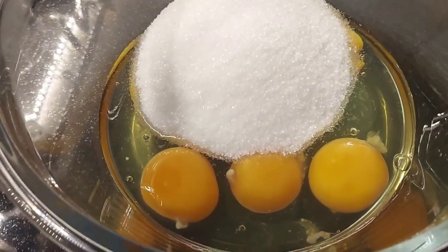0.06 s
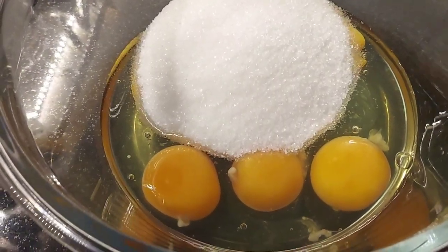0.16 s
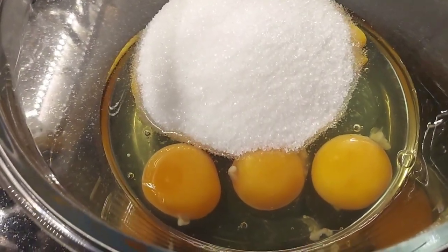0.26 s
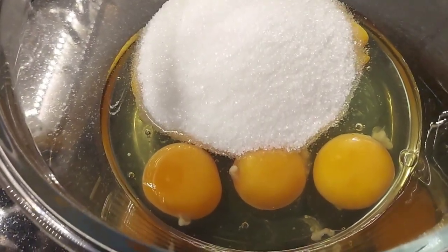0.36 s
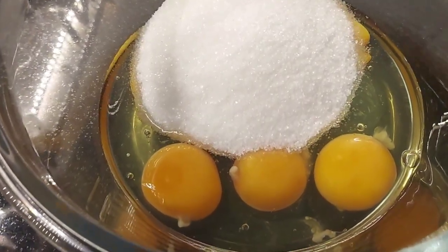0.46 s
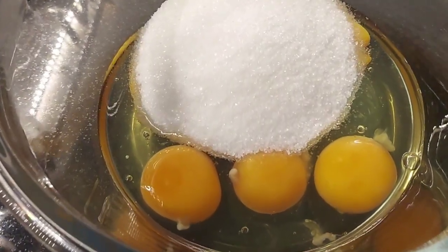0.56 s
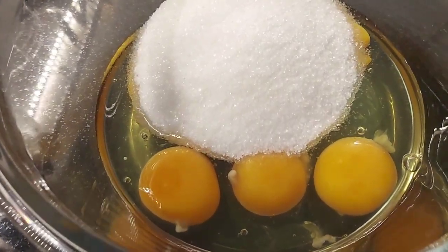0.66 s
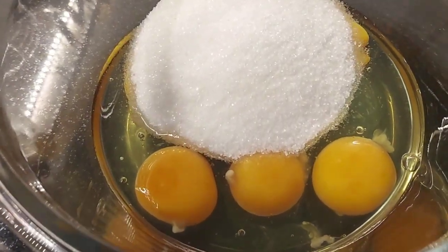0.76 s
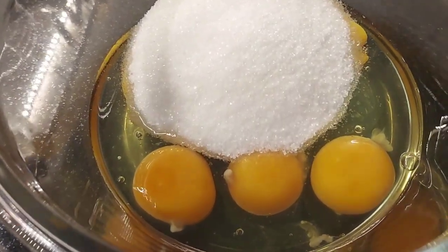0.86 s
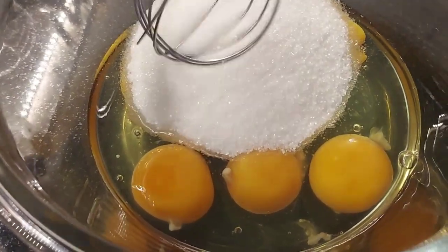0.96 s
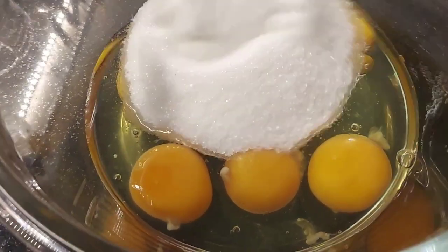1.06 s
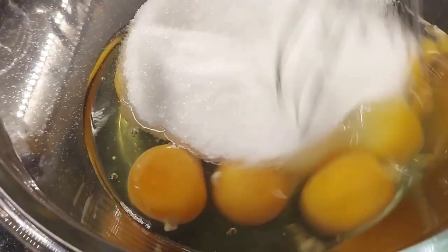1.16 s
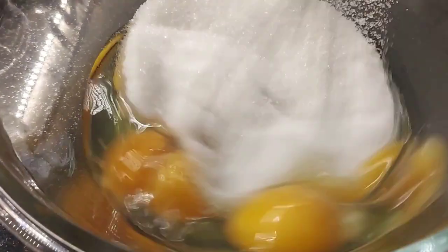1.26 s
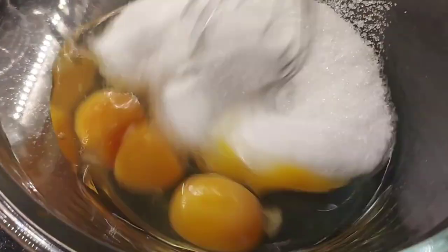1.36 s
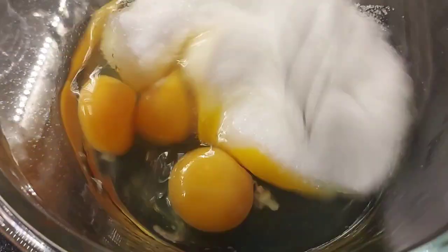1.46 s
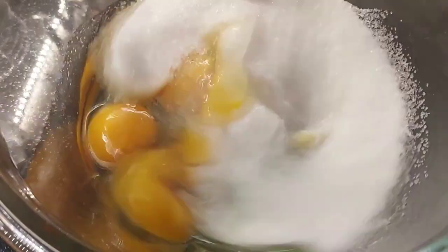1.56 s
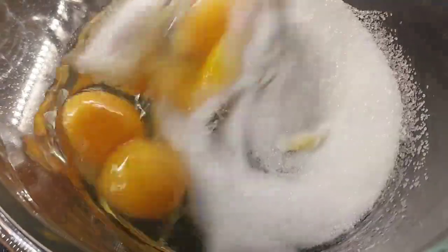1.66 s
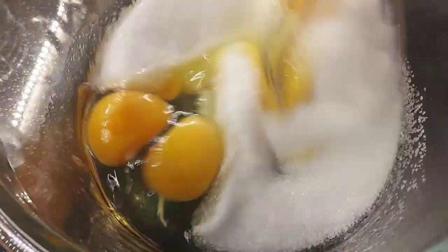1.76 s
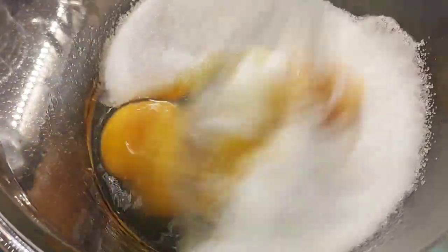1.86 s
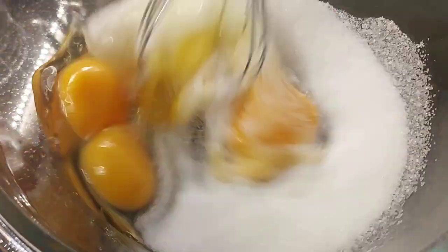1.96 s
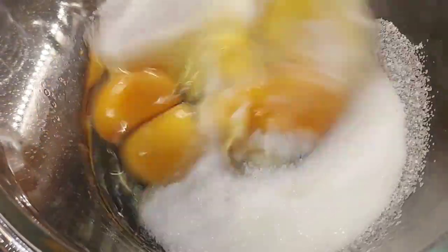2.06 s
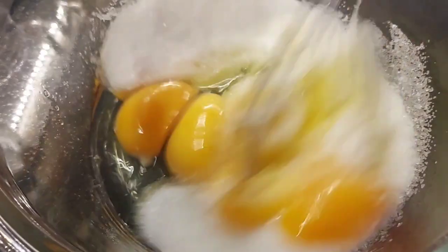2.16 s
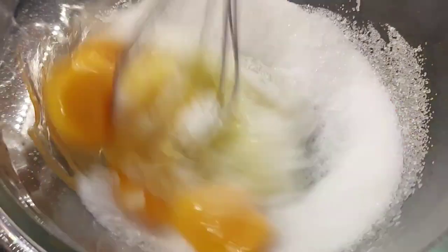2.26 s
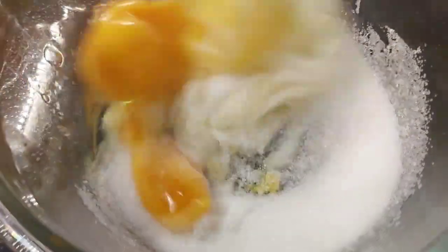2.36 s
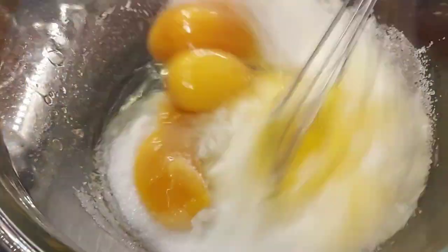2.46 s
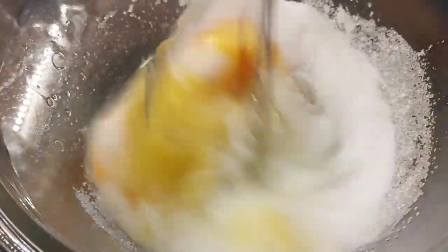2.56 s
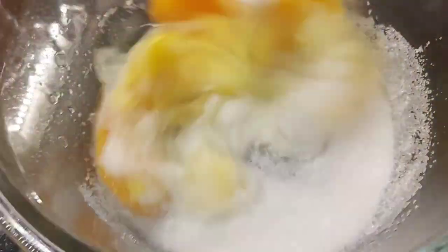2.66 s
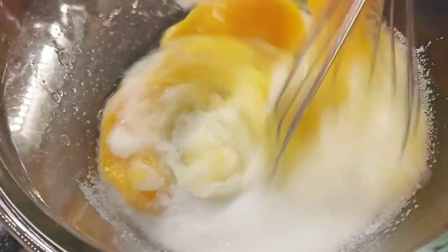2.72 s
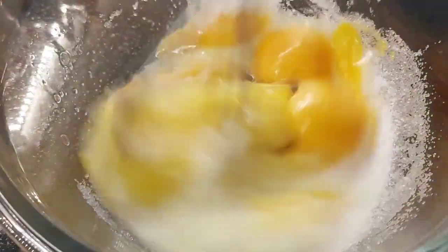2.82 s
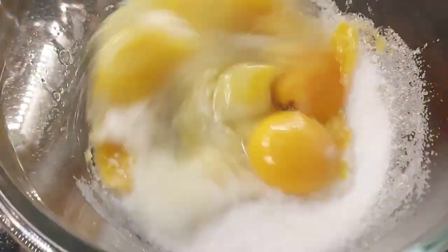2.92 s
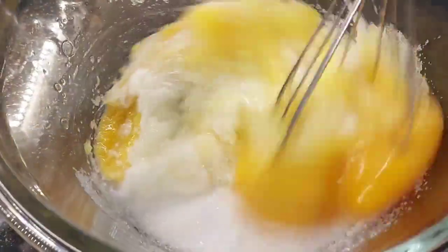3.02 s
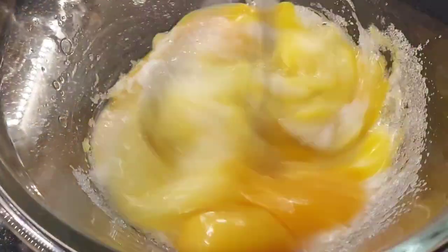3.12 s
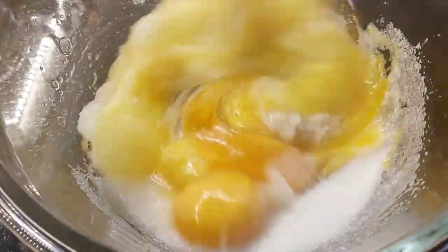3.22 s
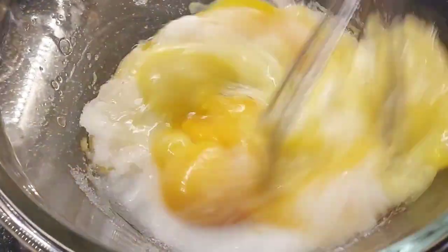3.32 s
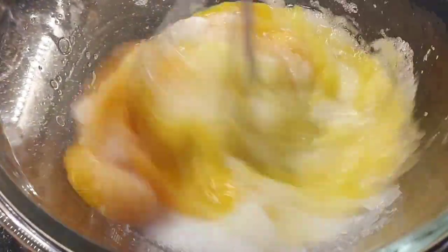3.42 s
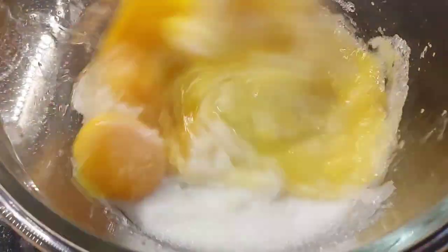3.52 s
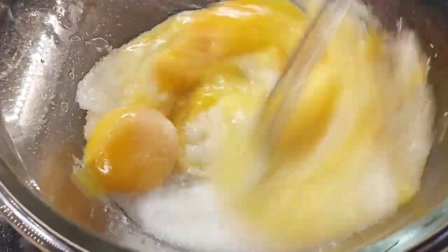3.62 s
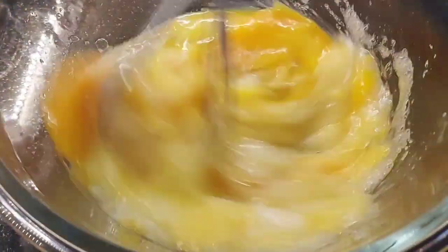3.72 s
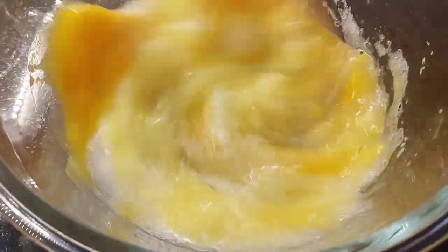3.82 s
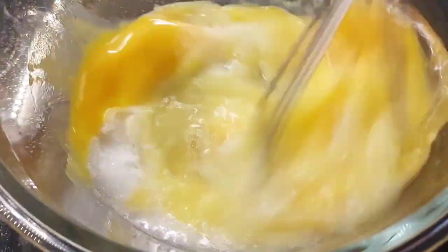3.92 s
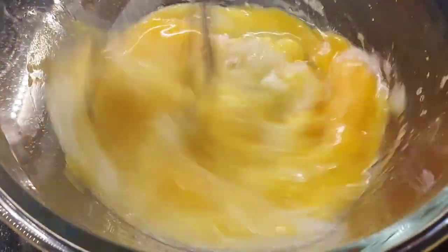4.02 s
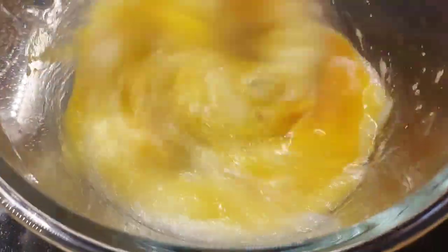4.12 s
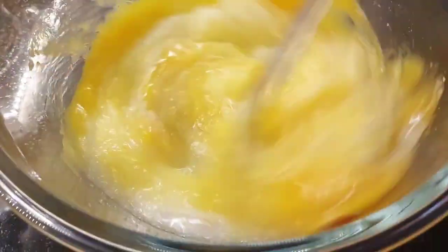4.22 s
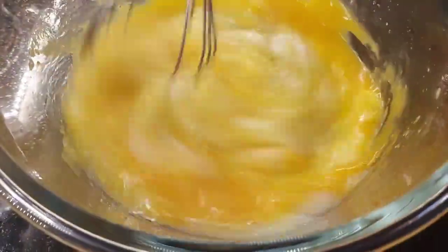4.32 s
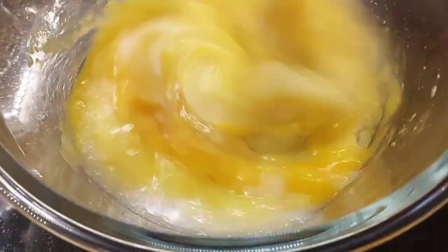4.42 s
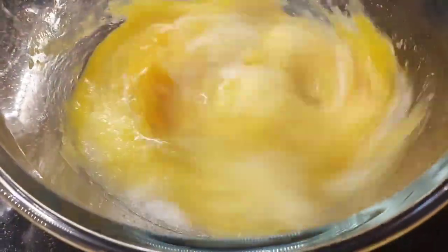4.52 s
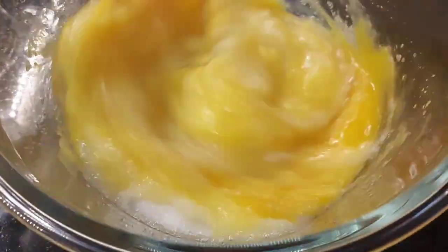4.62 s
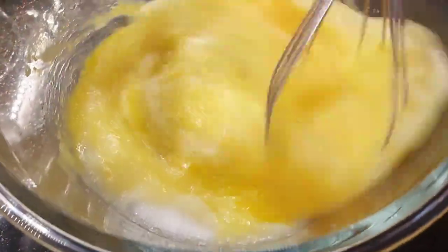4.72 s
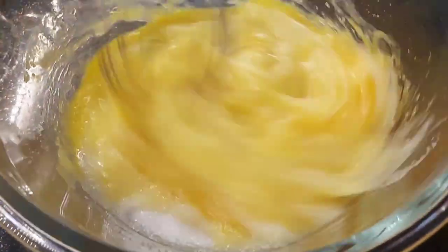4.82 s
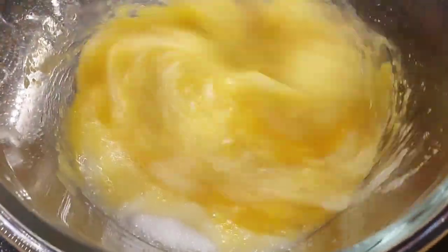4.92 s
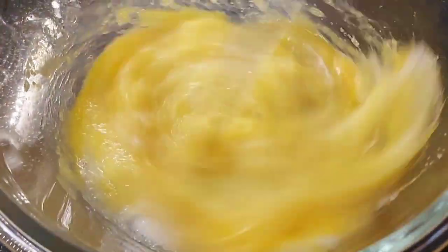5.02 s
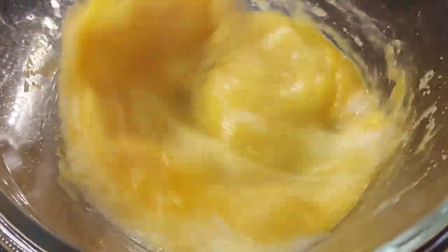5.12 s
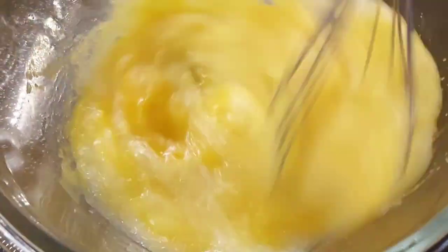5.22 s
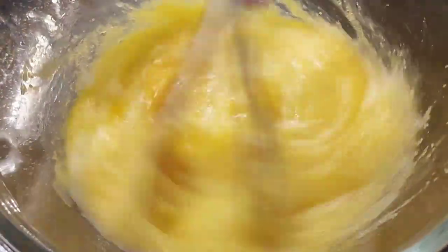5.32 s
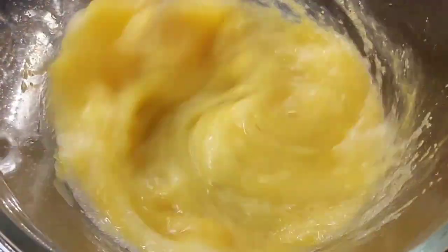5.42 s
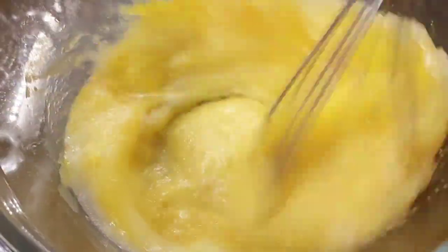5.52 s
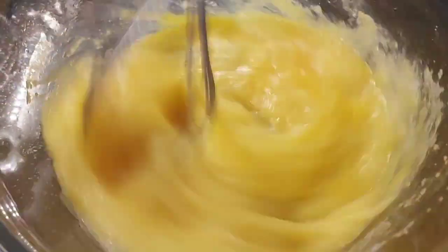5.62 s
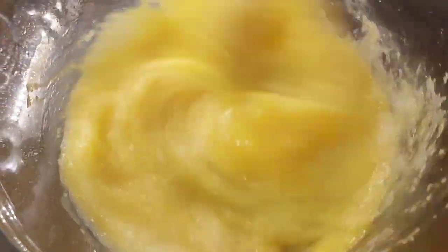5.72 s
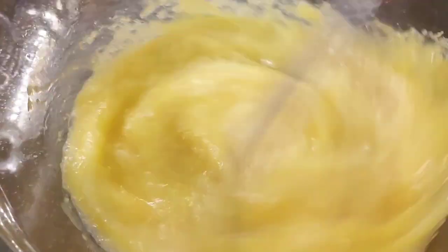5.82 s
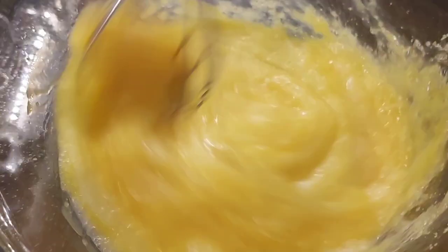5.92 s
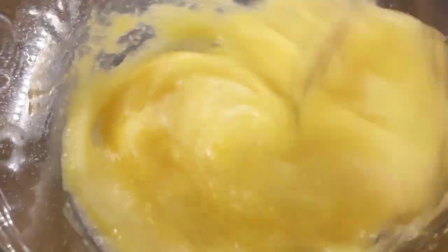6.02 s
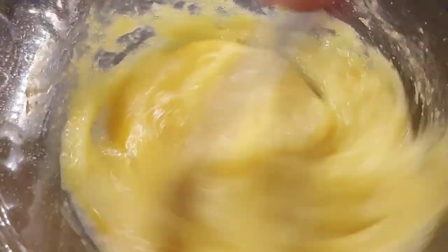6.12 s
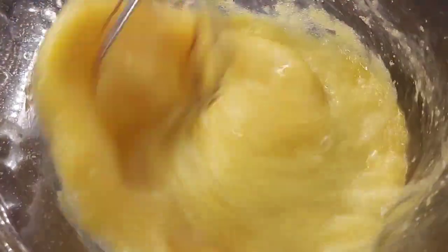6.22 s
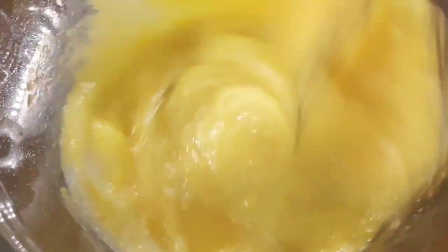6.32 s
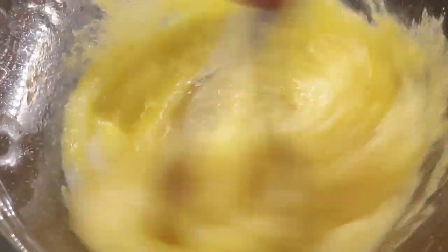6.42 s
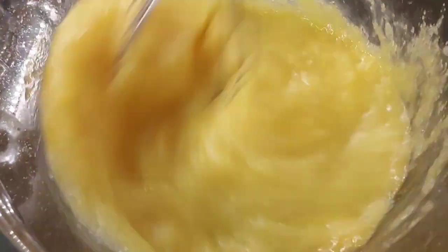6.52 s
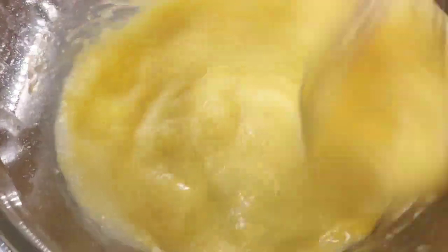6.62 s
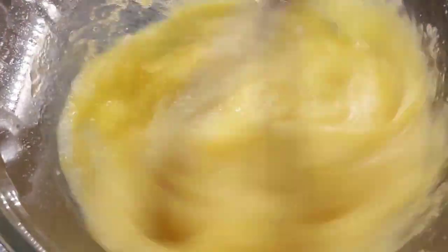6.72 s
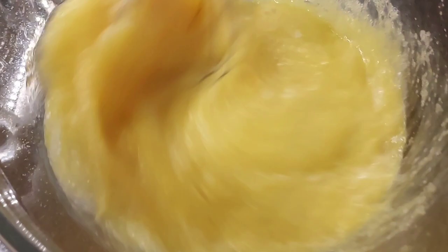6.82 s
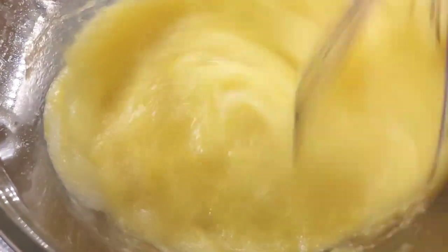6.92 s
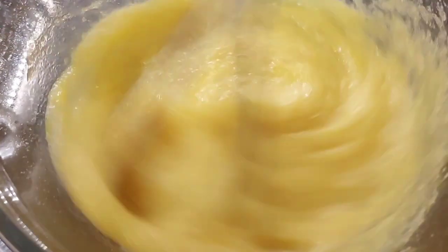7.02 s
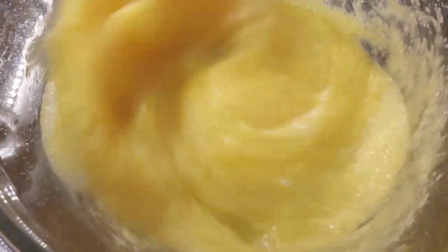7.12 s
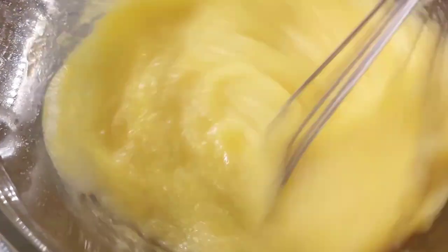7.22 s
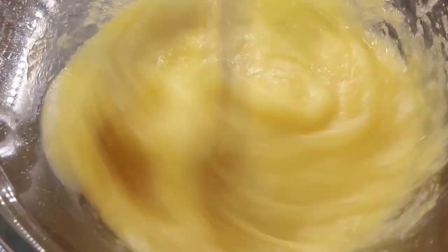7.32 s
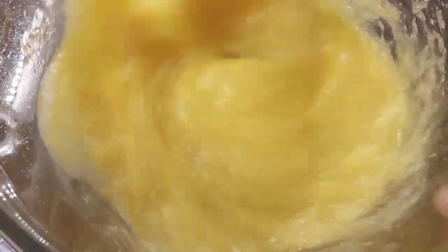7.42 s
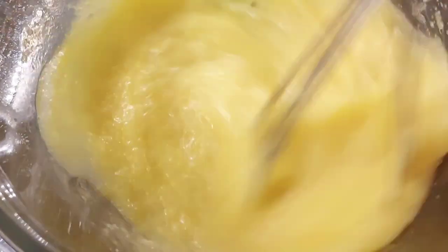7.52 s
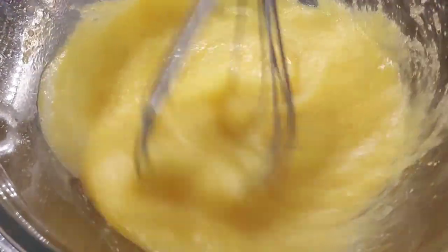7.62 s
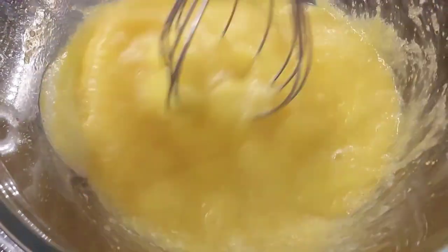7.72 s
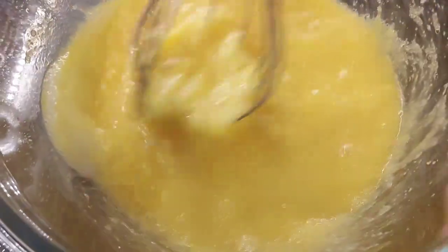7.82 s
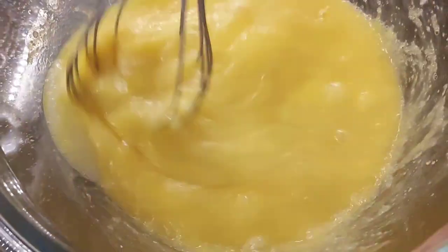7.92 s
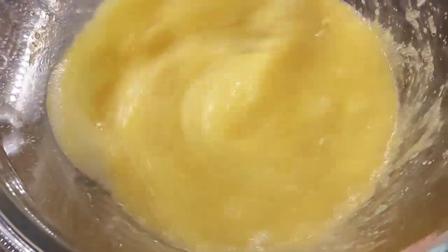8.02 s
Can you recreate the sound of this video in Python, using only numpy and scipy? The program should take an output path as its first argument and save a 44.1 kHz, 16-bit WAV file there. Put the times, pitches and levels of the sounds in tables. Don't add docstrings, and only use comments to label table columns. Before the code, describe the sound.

Close up in a small quiet kitchen, a faint utensil ring dies away and about a second of near silence follows. A wire whisk then grinds sugar and egg in a glass bowl in gritty, uneven strokes. As the mix gets wet, the wires clack, flick and scrape sharply on the glass with short rings, loudest in the later strokes, then stop.

```python
import sys
import numpy as np
from scipy import signal
from scipy.fft import rfft, irfft
from scipy.io import wavfile

SR = 44100
rng = np.random.default_rng(int(sys.argv[2]) if len(sys.argv) > 2 else 0)


def wav_out(sig):
    wavfile.write(sys.argv[1], SR, np.round(np.clip(np.atleast_2d(sig).T, -1, 1) * 32767).astype(np.int16))


def convert_level_to_amplitude(level_db):
    exponent = np.asarray(level_db, float) / 20
    return 10 ** exponent


N = 355887

# press_s, grit_db, slosh_db, ease_off_20db_s
TURNS = [(1.211, -37, -49, 0.0729), (1.58, -42, -56, 0.3436), (1.69, -52, -69.5, 0.02),
         (1.9, -45, -61, 0.43), (2.259, -43.5, -52, 0.5), (2.523, -36.5, -45.5, 0.1958),
         (2.81, -41, -49, .4), (3.121, -42, -49.5, .5), (3.375, -42, -54, .5), (3.693, -36.5, -46.5, 0.15),
         (4.022, -38, -44.5, 0.136), (4.146, -44, -52, 0.22), (4.289, -36, -44.5, 0.0859),
         (4.577, -32.5, -41, 0), (4.829, -32.5, -38.5, 0.07), (4.98, -39.5, -44, 0.29),
         (5.069, -35.5, -44, 0.04), (5.21, -38, -56, 0.46), (5.338, -37, -46.5, 0.2176),
         (5.61, -34.5, -38, 0.1319), (5.885, -33.5, -49, 0.0619), (6.04, -43.5, -50, 0.6),
         (6.153, -33.5, -56.5, 0.1738), (6.438, -32, -40, 0.1849), (6.741, -35.5, -43.5, 0.3281),
         (7.037, -30.5, -39, 0.0639), (7.168, -38.5, -44, 0.0944), (7.317, -37, -41, 0.1294),
         (7.5, -40, -44.5, 0.16), (7.621, -31.5, -50, 0.0281)]
# time_s, grit_db, slosh_db
IDLE = [(0, -66, -53), (.08, -63.5, -67), (.3, -64, -91), (.46, -72.5, -79), (.7, -90.5, -77),
        (.8, -62, -75), (.88, -63, -72), (.96, -79, -73.5), (1.052, -78.5, -71.5), (1.07, -56, -79.5),
        (2.2, -50, -58.5), (3.6, -53.5, -54.5), (4.3, -58.5, -60), (6.3, -56, -53.5), (7.6, -53.5, -52.5),
        (7.68, -61, -61), (7.742, -75, -76.5), (8.07, -70, -70.5)]
# time_s, share_0_to_1
WETNESS = [
    (0, 0),
    (2.0, .1),
    (3.2, .5),
    (4.3, 1),
    (8.07, 1),
]
# start_s, level_db, fall_t60_s, dull_re_bright_db
TOUCHES = [(.4002, -58, .012, 8), (.4285, -65, .089, -5.5), (1.1454, -35.5, 0.032, -24),
           (1.186, -33, 0.039, -17), (1.212, -31, 0.0506, -6), (1.593, -29, 0.047, -26.5),
           (1.677, -39.5, 0.036, -15.5), (1.9065, -34, 0.0605, -8), (2.2745, -31.5, 0.0296, -19),
           (2.358, -35, 0.0106, -25), (2.482, -31.5, 0.041, -28), (2.521, -31, 0.045, -21.5),
           (2.608, -35.5, 0.04, -13.5), (2.794, -37, 0.142, -7.5), (2.8956, -25, 0.0337, -8.5),
           (3.0033, -34, 0.0162, -25), (3.041, -35, 0.0415, -21.5), (3.0622, -35, 0.0326, -29.5),
           (3.3314, -34.5, .01, -9.5), (3.3691, -24.5, 0.0167, -19.5), (3.3837, -24.5, 0.0163, -21),
           (3.5747, -31, 0.0325, -14.5), (3.693, -27.5, 0.04, -17), (3.949, -35.5, 0.058, -4),
           (4.0104, -30, 0.0565, -24.5), (4.137, -34.5, 0.0243, 1), (4.2104, -31.5, 0.0224, -20),
           (4.2605, -33.5, 0.035, -6), (4.287, -25, 0.0505, -9.5), (7.8337, -72.5, .12, -2)]
# start_s, level_db, fall_t60_s, dull_re_bright_db
BUNDLE_SLAPS = [(4.5466, -30.5, 0.046, -13), (4.5659, -23.5, 0.057, -16), (4.7725, -31.5, 0.0355, -7),
                (4.828, -24.5, 0.044, -6.5), (4.975, -27, 0.031, -11.5), (4.9862, -22, 0.0248, -14.5),
                (5.057, -21, 0.027, -9.5), (5.075, -22, 0.041, -32), (5.2142, -20, 0.0237, -10.5),
                (5.231, -23, 0.0386, -22.5), (5.298, -26.5, 0.027, -17), (5.3298, -28, 0.122, -19.5),
                (5.6017, -17, 0.0222, -8), (5.6121, -15.5, 0.034, -20.5), (5.878, -20.5, 0.0286, -26),
                (5.8868, -19.5, 0.026, -21.5), (6.133, -24, 0.011, -5), (6.1416, -16, 0.046, -25.5),
                (6.366, -27.5, 0.0216, -1.5), (6.427, -20, 0.0473, -5.5), (6.4929, -25.5, 0.032, -19),
                (6.7256, -21.5, 0.0237, -16), (6.7522, -19.5, 0.0267, -26), (7.034, -28, 0.047, -22.5),
                (7.242, -29, 0.053, -6.5), (7.277, -27, 0.013, -9), (7.304, -29, 0.037, -16.5),
                (7.3172, -19, 0.0674, -5.5), (7.5448, -38.5, 0.0332, -2), (7.6093, -20.5, 0.0315, -18.5)]
# start_s, level_db
FLICKS = [(2.184, -42), (2.861, -39), (2.971, -41), (3.12, -37), (3.419, -36), (3.601, -33), (3.989, -36),
          (4.157, -32), (4.246, -32), (4.324, -35), (4.435, -41), (4.5899, -28), (4.68, -44), (4.751, -36),
          (4.857, -33), (4.919, -38), (5.0148, -31.5), (5.28, -28.5), (5.3653, -27.5), (5.512, -37),
          (5.562, -33), (5.575, -30), (5.5877, -33), (5.658, -33.5), (5.757, -35), (5.7765, -32),
          (5.7984, -28.5), (5.8232, -27.5), (5.933, -34), (6.051, -38), (6.068, -36), (6.084, -31),
          (6.109, -33), (6.1242, -29.5), (6.314, -32), (6.395, -33), (6.506, -33), (6.5436, -33.5),
          (6.596, -38), (6.67, -33), (6.694, -31), (6.815, -33), (6.957, -37), (7.097, -40), (7.187, -35),
          (7.2216, -35), (7.265, -29.5), (7.411, -41), (7.441, -36), (7.483, -28.5), (7.517, -37),
          (7.579, -33)]
# start_s, peak_db, pitch_hz
CRACKS = [(4.0097, -23.5, 3980), (4.2095, -25.5, 7910), (4.2591, -22.5, 4630), (4.2844, -20.5, 4000),
          (4.4937, -28.5, 2780), (4.5135, -24.5, 4800), (4.5276, -23.5, 1400), (4.5461, -21, 1340),
          (4.565, -17, 6540), (4.5774, -22, 4020), (4.5873, -21, 5700), (4.704, -26, 2710),
          (4.7356, -30.5, 6140), (4.7721, -21.5, 1350), (4.811, -22, 8740), (4.8314, -16.5, 7620),
          (4.9585, -23.5, 1930), (4.9736, -23.5, 6190), (4.9853, -20.5, 6470), (5.0559, -15, 1410),
          (5.0675, -13.5, 1220), (5.0736, -21, 3980), (5.1484, -36.5, 1470), (5.1656, -31, 5560),
          (5.2047, -21, 4170), (5.2112, -18.5, 3460), (5.23, -17, 6590), (5.2603, -21.5, 4070),
          (5.2774, -25.5, 4000), (5.2972, -19, 1310), (5.3301, -15, 8800), (5.5534, -24, 6520),
          (5.6005, -11.5, 1340), (5.6094, -14.5, 3980), (5.7184, -22, 12000), (5.7979, -27, 7590),
          (5.8218, -22.5, 8690), (5.8765, -14, 6680), (5.883, -13, 7440), (6.0089, -33, 9530),
          (6.1324, -17.5, 9320), (6.1404, -14, 6450), (6.215, -27.5, 1410), (6.361, -23.5, 11200),
          (6.3685, -21.5, 6470), (6.4261, -17.5, 1430), (6.432, -15, 2880), (6.4911, -19, 4020),
          (6.6677, -28, 2850), (6.6926, -25.5, 1400), (6.7241, -14, 6620), (6.7504, -17, 6400),
          (6.8044, -27, 7350), (6.8753, -28, 10400), (6.9557, -30.5, 6500), (6.99, -31, 8150),
          (7.007, -21, 1740), (7.1439, -29, 2740), (7.2401, -21.5, 1280), (7.3132, -13.5, 1430)]
# start_s, peak_db, pitch_hz
EARLY_CRACKS = [(1.1268, -37, 6480), (1.1418, -35, 2580), (1.1841, -34, 2570), (1.263, -35.5, 3650),
                (1.3204, -42, 3610), (1.503, -35.5, 2180), (1.5909, -27, 6600), (1.9001, -25.5, 3750),
                (1.9044, -27, 3540), (2.2728, -28.5, 5900), (2.356, -26.5, 11800), (2.4234, -35.5, 3710),
                (2.4808, -27.5, 6250), (2.5192, -26, 7240), (2.6045, -30, 4460), (2.794, -28, 4220),
                (2.8936, -20, 5400), (3.039, -33, 4000), (3.1842, -36, 2060), (3.3318, -29.5, 2010),
                (3.3552, -26.5, 1450), (3.3691, -20, 9250), (3.5718, -25, 2720), (3.6401, -33, 4010),
                (3.6639, -26.5, 4400), (3.6766, -23, 4020), (3.9423, -25, 2030), (7.0226, -18.5, 7130),
                (7.0594, -26.5, 1450), (7.163, -27.5, 3790), (7.22, -21.5, 1280), (7.262, -22.5, 1360),
                (7.3033, -13.5, 1404), (7.448, -28, 4210), (7.4812, -19.5, 1320), (7.5752, -28.5, 2100),
                (7.6052, -17, 4040)]
# start_s, length_s, level_db, pitch_hz
DRAGS = [(1.13, .06, -46, 6600), (1.185, .04, -46, 7400), (2.16, .08, -53, 3800), (2.46, .04, -46, 6400),
         (4.525, .02, -42, 1600), (4.57, .025, -37, 9000), (4.735, .03, -44, 8000), (4.81, .04, -38, 7600),
         (4.974, .03, -35, 6500), (5.06, .03, -37, 7500), (5.155, .02, -46, 6000), (5.33, .025, -34, 9000),
         (6.142, .03, -31, 7000), (6.43, .04, -35, 7000), (6.727, .02, -31, 6500), (6.875, .03, -43, 8000),
         (7.02, .035, -35, 7000), (7.313, .02, -31, 6500)]
# start_s, level_db, pitch_hz
RINGS = [(1.137, -41.5, 2580.0), (1.197, -41, 2580.0), (1.263, -39, 3670.0), (1.592, -36, 4005),
         (1.592, -39, 2580), (1.9, -30.5, 3670.0), (3.694, -31, 4005.0), (4.286, -29.5, 4005.0),
         (4.565, -31, 4005.0), (4.825, -33.5, 4005.0), (5.067, -37, 4005.0), (5.331, -40.5, 725.0),
         (5.61, -27.5, 4005.0), (5.878, -44, 590.0), (6.15, -31, 4005.0), (6.149, -39, 2580.0),
         (6.725, -31.5, 1431.0), (6.728, -41, 590.0), (6.731, -29, 4005.0), (7.293, -36, 725.0),
         (7.314, -40.5, 2580.0), (7.313, -37.5, 1431.0), (7.607, -33.5, 4005.0), (6.43, -36, 1431.0),
         (7.833, -68.5, 2580.0), (7.833, -65, 1431.0)]
# start_s, level_db, pitch_hz
MORE_RINGS = [(1.141, -42, 4005), (1.185, -42.5, 4005), (2.17, -41, 4005), (3.039, -40.5, 4005),
              (4.575, -38, 5682), (4.828, -29.5, 7710), (4.985, -30, 6450), (5.085, -42, 2580),
              (5.278, -34, 4005), (5.058, -34, 1991), (5.612, -39.5, 2580), (6.215, -43, 1410),
              (6.432, -36, 2900), (7.545, -42.5, 4005), (7.545, -45, 2580), (7.635, -44, 1431)]
# pitch_hz, level_db, t60_s
BOWL_MODES = [(590, -9, 0.168), (658.8, -9.5, 0.13), (725, -13, 0.088), (932.6, -12, 0.1),
              (1431, -5.5, 0.0997), (2128, -4.5, 0.036), (2580, -2.5, 0.134), (3670, -15.5, 0.028),
              (4005, -1, 0.0491), (5682, -5.5, 0.08), (6472, 0.5, 0.011), (7400, -3, 0.025),
              (8800, -12, 0.035), (12400, -9, 0.02)]
# freq_hz, density_db_per_hz
WET_GRIT = [(530, -36), (900, -8.5), (1380, -1.5), (1540, -7.5), (2370, -8), (2670, -1.5), (3200, -6),
            (3970, -2), (5290, -8), (6480, -1.5), (15700, -4.5)]
# freq_hz, density_db_per_hz
DRY_SUGAR = [(710, -28.5), (1300, -9.5), (2150, -4), (2800, -8), (3750, -4), (4600, -7), (5250, -14),
             (5900, -4.5), (6600, -2.5), (7600, -7.5), (9500, -9.5), (15700, -5.5)]
# freq_hz, density_db_per_hz
SLOSH = [(230, -32), (300, -7), (620, -5.5), (720, -0.5), (1150, -8.5), (1400, -4), (2200, -10),
         (3000, -39)]
PATCH_HZ = (1500, 2100, 2900, 3600, 4400, 5500, 7000, 8800, 11500, 16000)
PLACE_LAGS = (-7, 4, 19)
# start_s, peak_db, pitch_hz, t60_s
PLOPS = [(.4, -52, 130, .03), (2.515, -44.5, 398.4, 0.055), (2.598, -40.5, 325.6, 0.07),
         (2.796, -52.5, 480, 0.031), (2.889, -34.5, 388, 0.051), (3.003, -21.5, 1731, 0.0216),
         (3.189, -35.5, 127.4, 0.031), (3.332, -25, 2086, 0.00585), (3.572, -34, 2650, 0.015),
         (4.135, -21.5, 461, 0.0118), (4.703, -33, 2700, 0.025), (4.705, -30.5, 3410, 0.0168),
         (4.772, -37, 511.7, 0.072), (4.853, -26, 463, 0.0243), (5.214, -26, 380, 0.0095),
         (5.602, -23.5, 1017, 0.026)]
# start_s, peak_db, pitch_hz, length_s
ROCKS = [
    (1.45, -53, 100, .06),
    (2.605, -45, 42, .115),
    (2.895, -45, 42, .14),
    (3.19, -45, 42, .12),
    (6.46, -54, 36, .1),
]
# time_s, level_db
RUMBLE = [(0, -71), (.9, -79), (1.6, -62), (2.3, -59.5), (2.7, -58.5), (3.5, -63.5), (8.07, -65.5)]
# pitch_hz, level_db, t60_s
UTENSIL_MODES = [(900, -56, 0.35), (1048, -32, 0.0457), (1225, -48, 0.162), (1854, -52, 0.143),
                 (2670, -52, 0.5), (6030, -73, 0.3)]
# time_s, level_db
HUM = [(0, -73.5), (.9, -69.5), (1.2, -63), (3.0, -67.5), (4.5, -63), (7.0, -66.5), (8.07, -61)]
# freq_hz, density_db_per_hz
ROOM = [(12, -46), (20, -20), (47, -7), (112, -9), (238, -12.5), (534, -19), (631, -31.5), (767, -25.5),
        (1270, -31), (15500, -44.5)]
# freq_hz, likeness
ROOM_LIKENESS = [(60, 0.49), (240, 0.36), (950, -0.23), (3770, 0.11), (15000, 0.1)]

ENTER_S, RUN_UP_S, GRIP_S, GRIP_SHARE = 1.05, 0.1721, 0.0778, 0.288
PRESS_DB_PER_S, SURGE_DB_PER_S, SURGE_DRY_DB, SURGE_WET_DB, SLOSH_PACE = 39.5, 218.5, 2.5, 7.5, 0.899
FLICK_T60_S, FLICK_DULL_DB = 0.019, -15
RISE_T60_S, RISE_SHARE = .006, 0.218
CRACK_T60_S, CRACK_CYCLES, CRACK_TONE_DB, CRACK_LOW_HZ, CRACK_SHARED = .012, 30.0, 1.5, 1500, 0.595
DRAG_WIDTH, DRAG_EDGE_S = .11, .004
DEAD_HZ, DEAD_SHARE = 5150, .45
HUM_HZ, HUM_WANDER_HZ, ROOM_DB = 177, 3.5, -66


def rms_one(x):
    return x / np.sqrt(np.mean(x ** 2) + 1e-20)


def in_time(rows):
    s, *columns = np.transpose(rows)
    return [np.interp(np.arange(N) / SR, s, c) for c in columns]


def at_hz(points, hz):
    table_hz, values = np.transpose(points)
    return np.interp(np.log(hz), np.log(table_hz), values)


def drift(rate_hz):
    r = np.exp(-80 * np.pi * rate_hz / SR)
    noise = rng.standard_normal(N // 40 + 2002)
    slow = signal.lfilter([1], [1, -2 * r, r * r], noise)[2000:]
    return np.interp(np.arange(N) / 40, np.arange(len(slow)), rms_one(slow))


def ring(clicks, hz, t60):
    r, w = convert_level_to_amplitude(-60 / (t60 * SR)), 2 * np.pi * hz / SR
    return signal.lfilter([0, np.sin(w)], [1, -2 * r * np.cos(w), r * r], clicks + 1e-18)


def filtered(x, order, hz, kind):
    return signal.sosfilt(signal.butter(order, hz, kind, fs=SR, output="sos"), x)


def colour(x, spectrum):
    cepstrum = irfft(np.log(convert_level_to_amplitude(at_hz(spectrum, np.linspace(1, SR / 2, 4097)))))
    cepstrum[1:4096] *= 2
    response = irfft(np.exp(rfft(cepstrum[:4097], 8192)))[:4096]
    response = response / np.sqrt(np.sum(response ** 2))
    return signal.oaconvolve(x, np.atleast_2d(response), axes=1)[:, :N]


def crystals(per_s, spread_db):
    sizes = convert_level_to_amplitude(spread_db * np.minimum(rng.exponential(1, N), 4)) * rng.choice([-1, 1], N)
    return rms_one(sizes * (rng.random(N) < per_s / SR))


def grains(per_s, spread_db, shared, wander_db):
    direct = 0
    wet, = in_time(WETNESS)
    for lag, often in zip(PLACE_LAGS, (0.9, 0.5 + 0.6 * wet, 1.3 - 0.6 * wet)):
        place = often * crystals(per_s, spread_db) * convert_level_to_amplitude(wander_db * drift(7.75))
        direct = direct + np.array([np.roll(place, lag), place])
    unshared = np.array([crystals(per_s, spread_db), crystals(per_s, spread_db)])
    return np.sqrt(shared) * rms_one(direct) + np.sqrt(1 - shared) * unshared


def whisk():
    grit_db, slosh_db = stirring()
    wet, = in_time(WETNESS)
    bright, dull = slap_envelopes()
    skip = convert_level_to_amplitude((1.2 + 1.2 * wet) * drift(90.0))
    grind = convert_level_to_amplitude(grit_db - 1.1) * skip * grains(14000, 3.67, 0.321, wander_db=2.2)
    dry_grind = np.sqrt(1 - wet) * grind
    force = np.sqrt(wet) * grind + bright * grains(10000, 3.39, 0.484, wander_db=1.5)
    sound = convert_level_to_amplitude(-1.5) * colour(force, WET_GRIT) + convert_level_to_amplitude(-1.77) * colour(dry_grind, DRY_SUGAR)
    loose = 1 / (1 + np.mean(bright ** 2, axis=0) / convert_level_to_amplitude(grit_db) ** 2)
    sound = contact_patches(sound, loose) + bowl_modes(force + 0.59 * dry_grind)
    sound = filtered(sound, 2, 110, "high")
    push = (convert_level_to_amplitude(slosh_db - 3.5 + 2.66 * drift(29.0)) + dull) * grains(2500, 3.7, 0.9757, wander_db=3.0)
    sound = sound + (cracks() + drags()) * convert_level_to_amplitude([[-.6], [.6]])
    gap = signal.lfilter(*signal.iirpeak(DEAD_HZ, 8.0, fs=SR), sound)
    sound = sound - DEAD_SHARE * (1 - wet) ** 3 * gap
    return sound + colour(push, SLOSH) * convert_level_to_amplitude([[.6], [-.6]]) + glass_rings()


def stirring():
    t = np.arange(N) / SR
    grit, slosh = convert_level_to_amplitude(np.array(in_time(IDLE))) ** 2
    wet, = in_time(WETNESS)
    surge_db = SURGE_DRY_DB + (SURGE_WET_DB - SURGE_DRY_DB) * wet
    free_s = ENTER_S
    for s, grit_db, slosh_db, ease_s in TURNS:
        press_db = np.maximum(SURGE_DB_PER_S * (t - s), PRESS_DB_PER_S * (t - s) - surge_db)
        off_db = np.where(t < s, press_db, 20 * (s - t) / ease_s)
        run_up_s = RUN_UP_S / (0.32 + 0.719 * wet[round(s * SR)])
        start_s = max(min(free_s, s - GRIP_S), s - run_up_s)
        grip = np.clip((t - start_s) / (GRIP_SHARE * (s - start_s)), 0, 1) ** 3
        grit = grit + grip * convert_level_to_amplitude(grit_db + off_db) ** 2
        slosh = slosh + grip * convert_level_to_amplitude(slosh_db + SLOSH_PACE * off_db) ** 2
        free_s = s + ease_s
    return 10 * np.log10(grit), 10 * np.log10(slosh)


def slap_envelopes():
    bright, dull = np.zeros((2, 2, N))
    before, after = SR // 20, SR // 10
    t = np.arange(-before, after) / SR
    flicks = [(s, db, FLICK_T60_S, FLICK_DULL_DB) for s, db in FLICKS]
    slaps = TOUCHES + BUNDLE_SLAPS + flicks
    for (s, db, fall_s, dull_db), side in zip(slaps, rng.standard_normal(len(slaps))):
        i = round(s * SR)
        span = slice(i - before, i + after)
        shape_db = -60 * np.where(t < 0, -t / (RISE_T60_S + RISE_SHARE * fall_s), t / fall_s)
        pan_db = (1.26 * side - 0.4549) * np.array([[1], [-1]])
        bright[:, span] += convert_level_to_amplitude(db + 1.3 + shape_db + pan_db) ** 2
        dull[:, span] += convert_level_to_amplitude(db + dull_db - 3.0 + 1.295 * shape_db) ** 2
    return np.sqrt(bright), np.sqrt(dull)


def contact_patches(sound, loose):
    for low, high in zip(PATCH_HZ, PATCH_HZ[1:]):
        band = filtered(sound, 1, [low, high], "band")
        sound = sound + band * (convert_level_to_amplitude(2.2 * (0.3 + 0.7 * loose) * drift(30.0)) - 1)
    return sound


def bowl_modes(force):
    out = np.zeros((2, N))
    for hz, db, t60 in BOWL_MODES:
        width = np.sqrt(1 - convert_level_to_amplitude(-120 / (t60 * SR)))
        out += convert_level_to_amplitude(db - 15.5) * width * ring(force * convert_level_to_amplitude(3.3 * drift(25.0)), hz, t60)
    return out


def cracks():
    rows, t = CRACKS + EARLY_CRACKS, np.arange(SR // 25) / SR
    out = np.zeros((2, N))
    for (s, db, hz), noise in zip(rows, rng.standard_normal((len(rows), 3, len(t)))):
        common = np.array([np.roll(noise[0], PLACE_LAGS[1]), noise[0]])
        burst = np.sqrt(CRACK_SHARED) * common + np.sqrt(1 - CRACK_SHARED) * noise[1:]
        burst = burst * convert_level_to_amplitude(-60 * t / CRACK_T60_S)
        tone = ring(burst, hz, CRACK_CYCLES / hz)
        tone = tone * np.sqrt(np.sum(burst ** 2) / np.sum(tone ** 2))
        i = round(s * SR)
        out[:, i:i + len(t)] += convert_level_to_amplitude(db - 9.0) * (burst + convert_level_to_amplitude(CRACK_TONE_DB) * tone)
    return filtered(out, 2, CRACK_LOW_HZ, "high")


def drags():
    out, t = np.zeros((2, N)), np.arange(N) / SR
    force = grains(2500, 4.5, 0.5, wander_db=1.5)
    for s, length, db, hz in DRAGS:
        span = slice(round((s - .02) * SR), round((s + length + .05) * SR))
        fade_in = np.clip((t[span] - s) / DRAG_EDGE_S, 0, 1)
        fade_out = np.clip((s + length - t[span]) / (1.5 * DRAG_EDGE_S) + 1, 0, 1)
        edges_hz = hz * (1 + DRAG_WIDTH * np.array([-1, 1]))
        band = rms_one(filtered(force[:, span], 2, edges_hz, "band"))
        out[:, span] += convert_level_to_amplitude(db - 4.0) * fade_in * fade_out * band
    return out


def glass_rings():
    out, t = np.zeros((2, N)), np.arange(SR // 4) / SR
    rows = RINGS + MORE_RINGS
    mode_t60 = [(hz, t60) for hz, _, t60 in BOWL_MODES]
    for (s, db, hz), offset in zip(rows, rng.standard_normal(len(rows))):
        t60 = (1.6 if s < 2 else 1.25) * at_hz(mode_t60, hz)
        shape = np.minimum(t / 0.00233, 1) * convert_level_to_amplitude(db + 2.0 - 60 * t / t60)
        port_s = np.array([[0], [0.00009 * offset]])
        tone = shape * np.sin(2 * np.pi * hz * (s + t + port_s))
        i = round(s * SR)
        out[:, i:i + len(t)] += tone[:, :N - i]
    wet, = in_time(WETNESS)
    return out * convert_level_to_amplitude((0.3 + 1.7 * wet) * drift(70.0))


def batter():
    out, t = np.zeros(N), np.arange(SR // 10) / SR
    for s, db, hz, t60 in PLOPS:
        i = round(s * SR)
        out[i:i + len(t)] += convert_level_to_amplitude(db - 60 * t / t60) * np.sin(2 * np.pi * hz * t * (1 + 1.18 * t))
    return filtered(out, 2, 90, "high")


def counter():
    out, t = np.zeros(N), np.arange(N) / SR
    for s, db, hz, length in ROCKS:
        swell = np.sin(np.pi * np.clip((t - s) / length, 0, 1)) ** 0.62
        out += convert_level_to_amplitude(db) * swell * np.sin(2 * np.pi * hz * (t - s))
    low = filtered(rng.standard_normal(N), 2, [28, 125], "band")
    out += convert_level_to_amplitude(in_time(RUMBLE)[0] - 2.5) * rms_one(low)
    rattle = rng.standard_normal(N) * convert_level_to_amplitude(-34 - 60 * t / 0.1) * np.minimum(0.3 + t / 0.015, 1)
    for hz, db, t60 in UTENSIL_MODES:
        out += convert_level_to_amplitude(db - 10.0) * ring(rattle, hz, t60) * 10
    return out


def kitchen(x, t60, wet_db):
    t = np.arange(SR // 2) / SR
    tail = rng.standard_normal((2, len(t))) * convert_level_to_amplitude(-60 * t / t60) * (t > .004)
    tail = signal.lfilter([1], [1, -.5], tail)
    tail = tail / np.sqrt(np.sum(tail ** 2) / 2)
    return convert_level_to_amplitude(wet_db) * signal.oaconvolve(x, tail, axes=1)[:, :N]


def kitchen_air():
    mid, side = rng.standard_normal((2, 1, N))
    apart_db = [(hz, 10 * np.log10((1 - min(c + .25, .98)) / (1 + max(c, -.5)))) for hz, c in ROOM_LIKENESS]
    hz = np.linspace(1, SR / 2, N // 2 + 1)
    side = irfft(rfft(side) * convert_level_to_amplitude(at_hz(apart_db, hz)), N)
    air = rms_one(colour(np.vstack([mid + side, mid - side]), ROOM))
    hum_hz = HUM_HZ + HUM_WANDER_HZ * drift(17.98)
    hum = np.sin(2 * np.pi * np.cumsum(hum_hz) / SR) * convert_level_to_amplitude(3.0 * drift(10.0))
    return convert_level_to_amplitude(ROOM_DB) * air + convert_level_to_amplitude(in_time(HUM)[0]) * rms_one(hum)


def scene():
    bowl = whisk() + batter()
    return bowl + kitchen(bowl, t60=0.1296, wet_db=-15.5) + counter() + kitchen_air()


def low_pass(x):
    return signal.sosfilt(signal.butter(12, 17130, fs=SR, output="sos"), x)


def record(dry):
    top = signal.ellip(10, .5, 45, 15900, fs=SR, output="sos")
    mix = signal.sosfilt(top, dry)
    return low_pass(mix)


dry = scene()
out = record(dry)
wav_out(out)
```